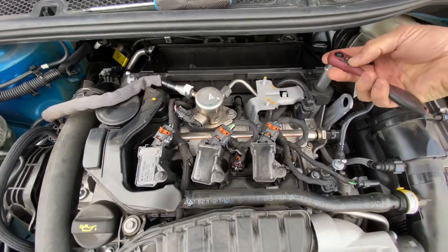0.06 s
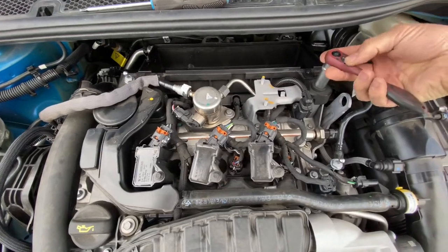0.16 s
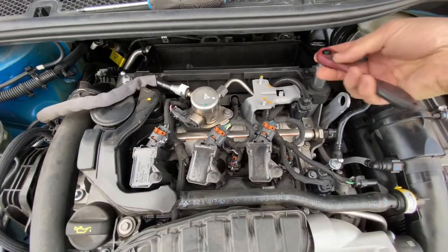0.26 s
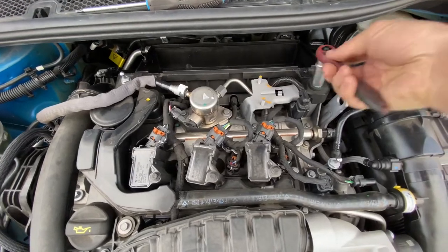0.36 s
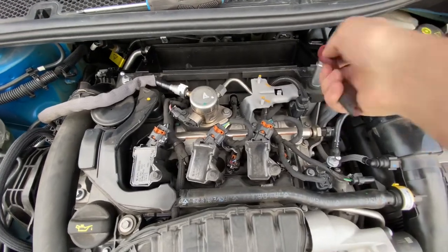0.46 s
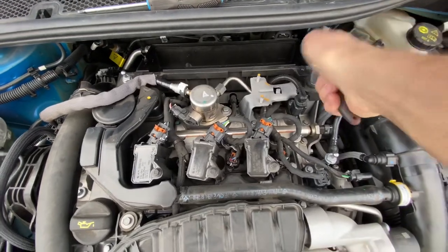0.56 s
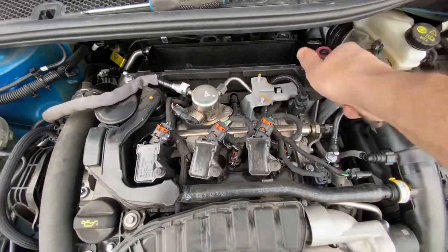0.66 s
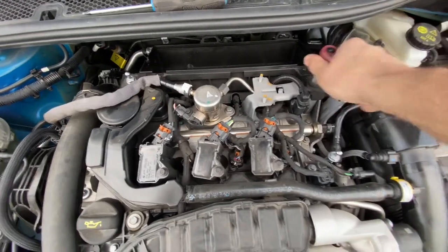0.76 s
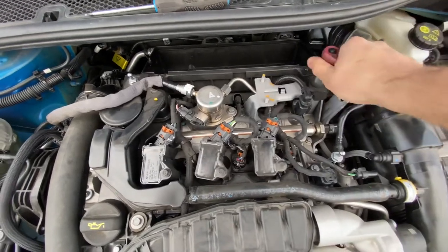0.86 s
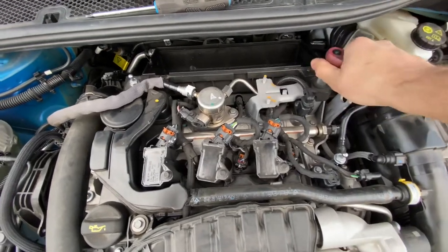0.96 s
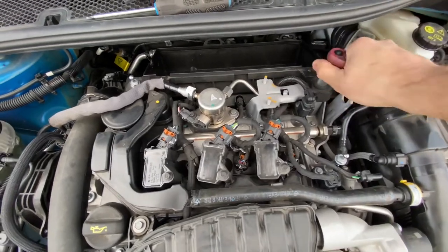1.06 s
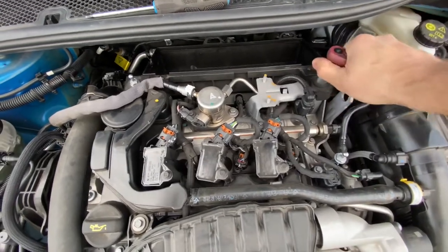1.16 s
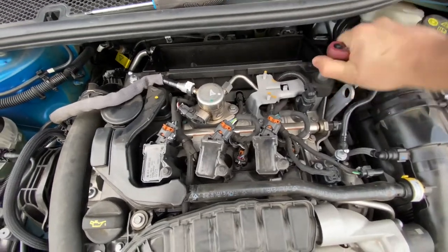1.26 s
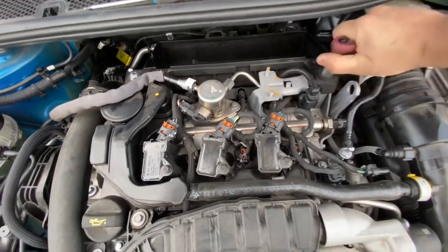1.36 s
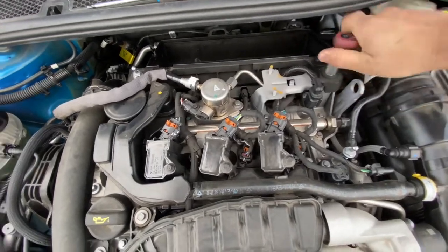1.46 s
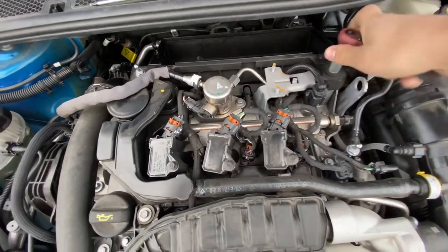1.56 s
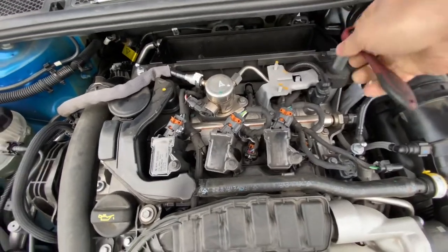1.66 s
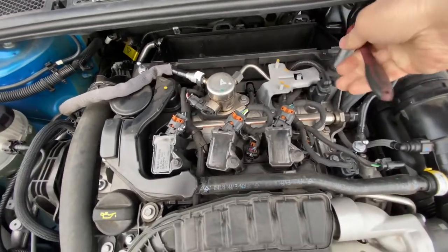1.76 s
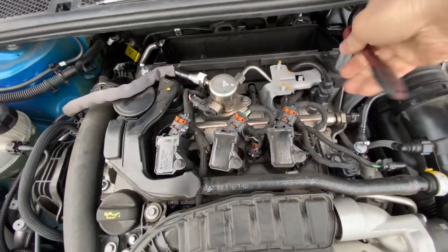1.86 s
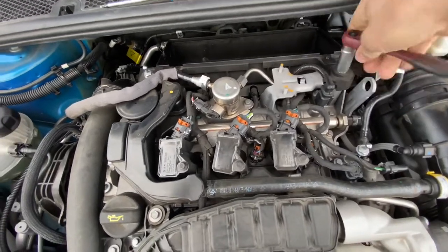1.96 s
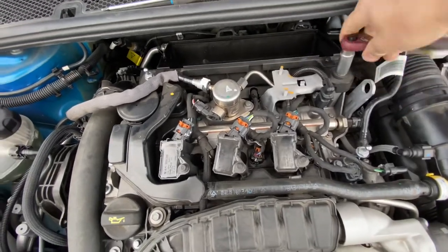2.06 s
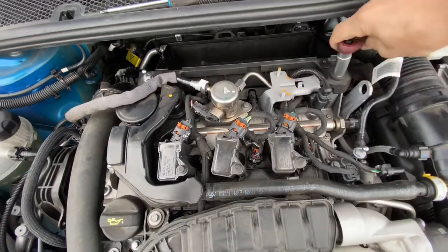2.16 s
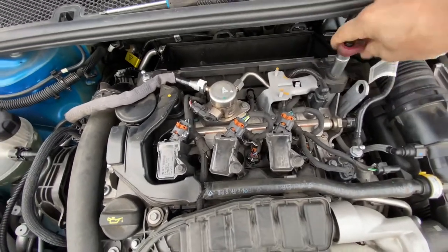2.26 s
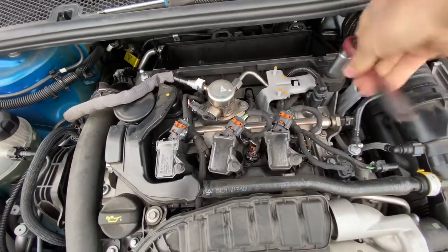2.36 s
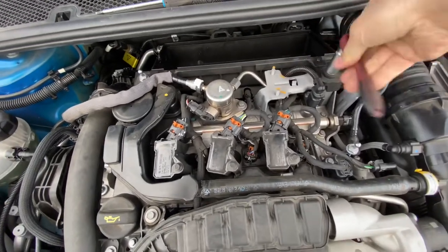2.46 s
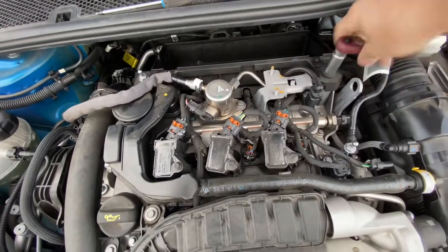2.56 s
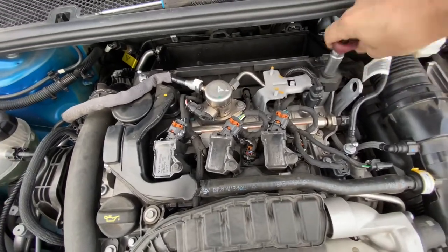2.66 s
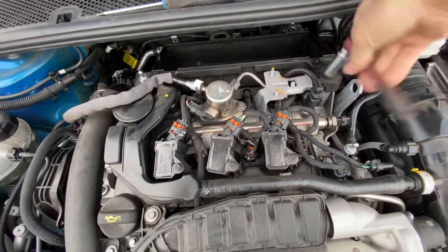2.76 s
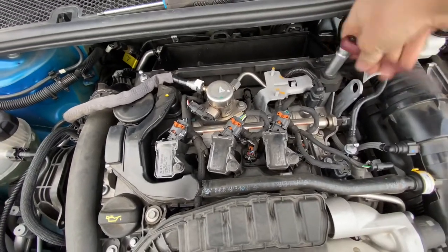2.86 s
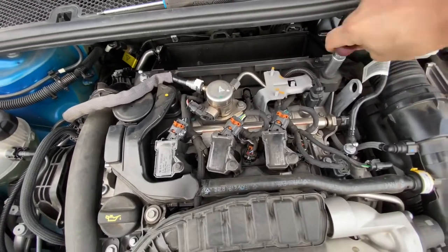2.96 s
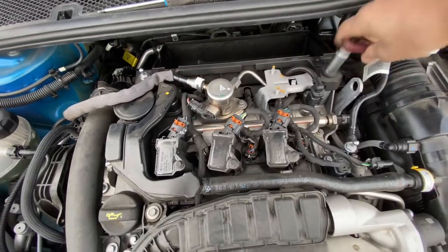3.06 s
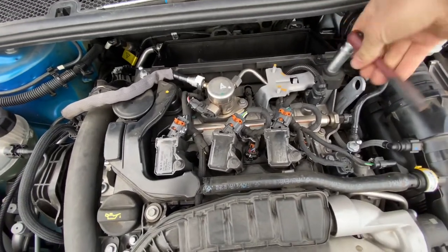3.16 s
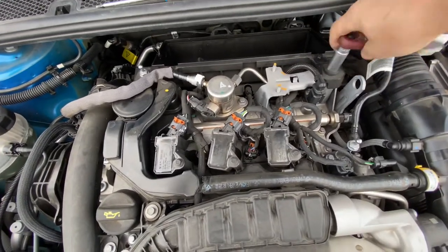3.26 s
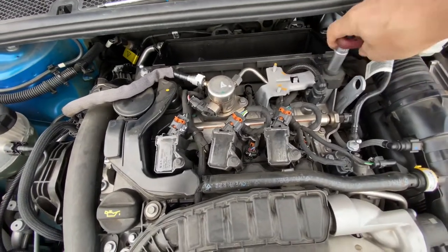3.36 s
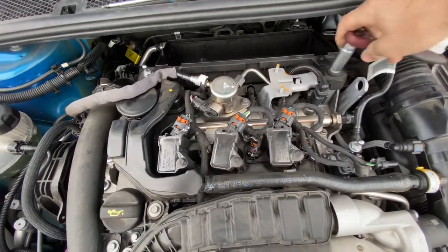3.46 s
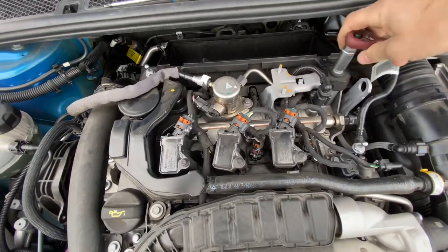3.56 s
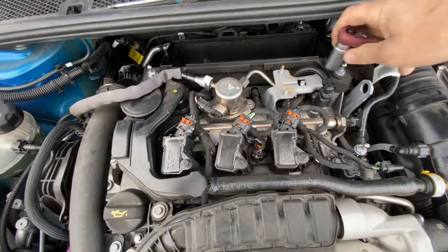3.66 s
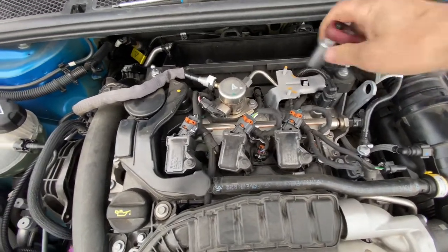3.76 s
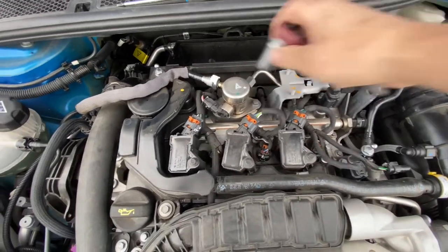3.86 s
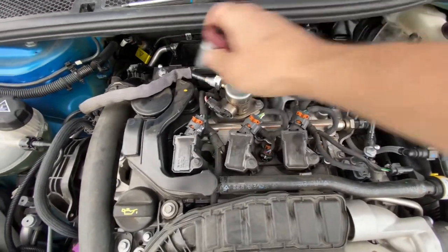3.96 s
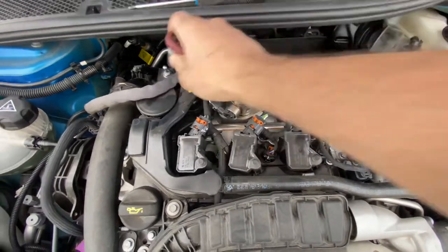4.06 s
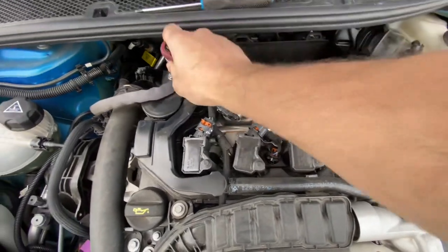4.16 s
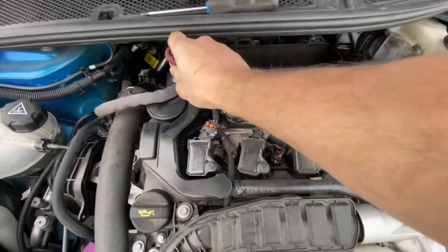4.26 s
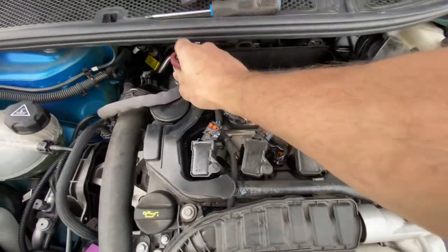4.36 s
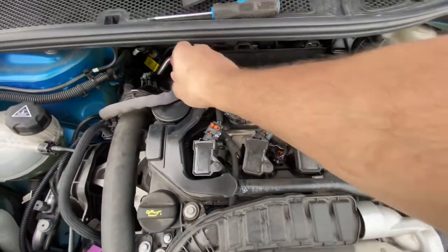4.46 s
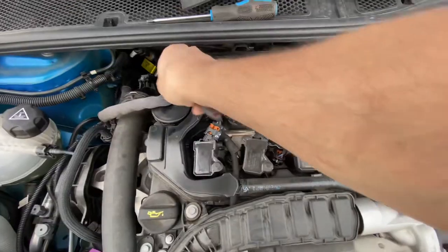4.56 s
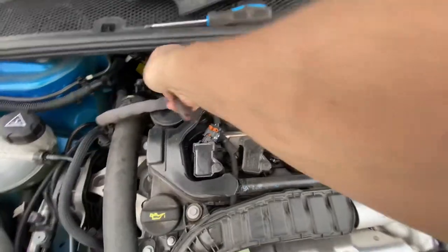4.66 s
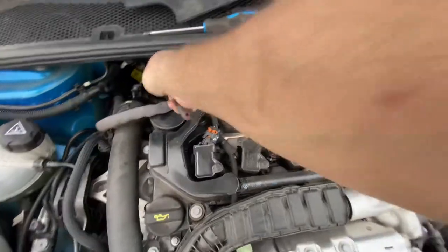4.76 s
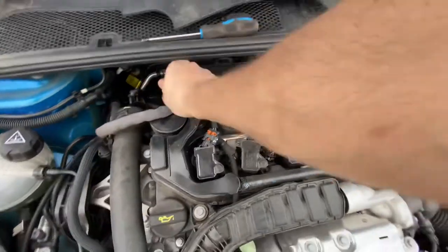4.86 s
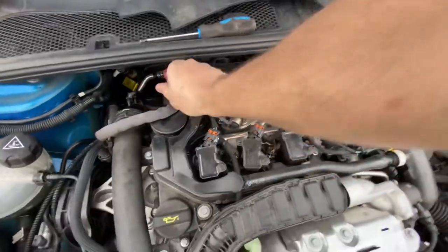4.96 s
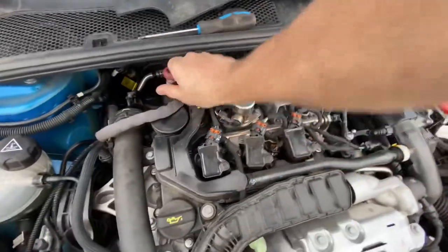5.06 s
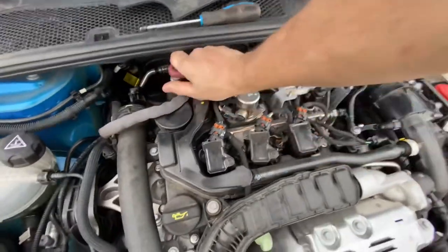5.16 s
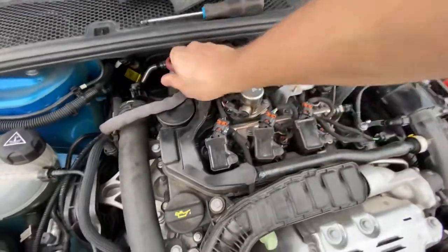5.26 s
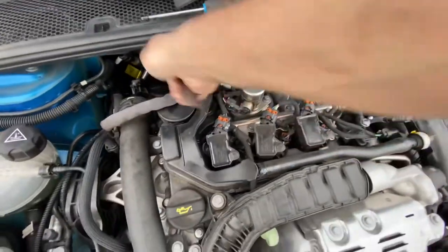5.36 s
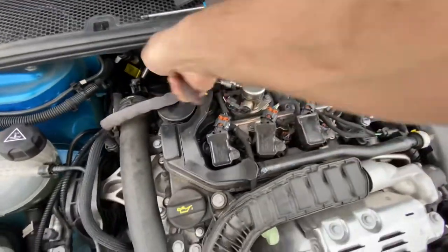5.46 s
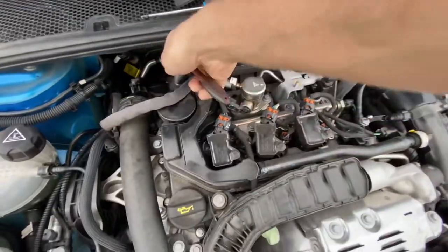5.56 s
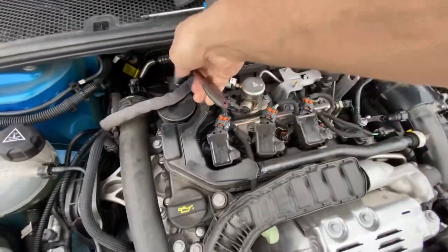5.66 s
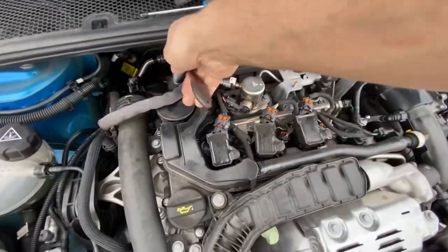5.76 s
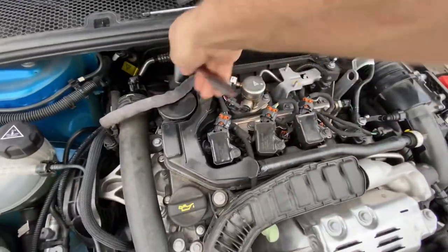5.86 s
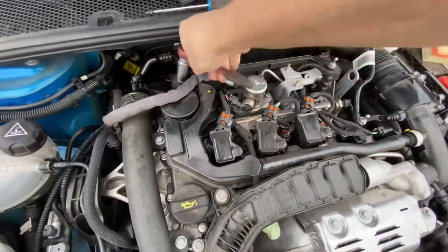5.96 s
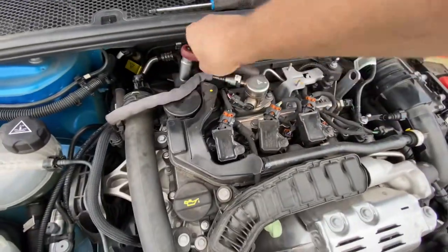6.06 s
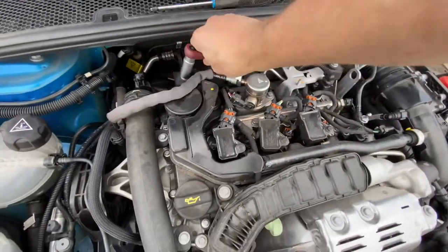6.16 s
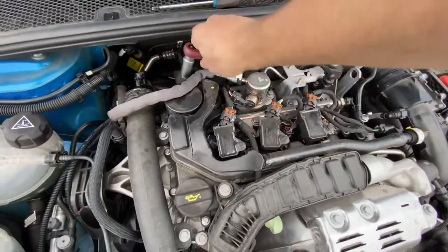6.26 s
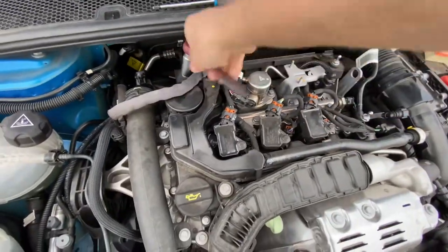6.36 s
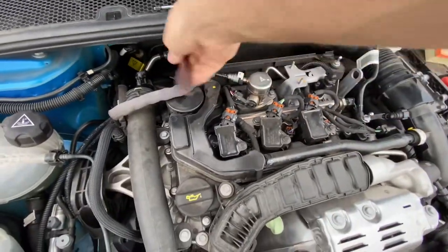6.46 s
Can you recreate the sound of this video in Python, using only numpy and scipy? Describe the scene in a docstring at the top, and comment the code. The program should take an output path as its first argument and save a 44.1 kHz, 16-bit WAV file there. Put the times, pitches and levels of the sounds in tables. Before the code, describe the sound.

Close metallic ratchet clicks, rattles and scrapes work at one bolt, then harder knocks and sparser clicks follow at another, over soft low wind buffeting.

```python
"""Gusts buffet a small two-port microphone as low lumps, over a filtered-noise traffic wash and a wavering hum.
Close by, in an open engine bay, a ratchet wrench works bolts loose: its socket scrapes (friction grains ringing
steel), chatters (chance taps) and knocks on the engine (struck modes), booming a hollow cover. The pawl clicks
over the gear teeth as bright steel rings with a noise crack, and single-pitch bursts add thuds and pings."""
import sys
import numpy as np
from scipy import signal
from scipy.fft import rfft, irfft
from scipy.io import wavfile

SR = 44100
rng = np.random.default_rng(int(sys.argv[2]) if len(sys.argv) > 2 else 0)


def invert_db(level):
    """Linear amplitude ratio for a level in decibels (20 dB per decade), elementwise."""
    return 10 ** (np.asarray(level, dtype=float) / 20)


def to_wav(s):
    """Save 16-bit WAV."""
    ch = np.atleast_2d(s).T  # columns
    pcm = np.round(np.clip(ch, -1, 1) * 32767)  # PCM
    wavfile.write(sys.argv[1], SR, pcm.astype(np.int16))


N = 287928  # scene length in samples

# Wind on the microphone, before the trim of each port: t/s, level/dB
GUST_LEVEL = [(0.0, -47.5), (0.45, -41), (0.77, -50.5), (0.95, -84), (1.0, -52), (1.06, -72), (1.15, -49),
              (1.27, -44), (1.43, -73), (1.55, -52.5), (1.86, -47.5), (2.02, -57), (2.12, -37),
              (2.3, -62.5), (2.52, -45.5), (2.98, -44), (3.18, -34.5), (3.58, -56), (3.64, -76),
              (4.55, -70), (4.63, -45.5), (4.75, -63.5), (5.6, -52), (6.53, -52.5)]
# Tone filter of the wind: f/Hz, relative gain/dB
GUST_COLOUR = [(25, -19.5), (65, 0.5), (250, -3.5), (450, -10), (1200, -35.5)]
# Tone of the distant traffic: f/Hz, relative level/dB per Hz
TRAFFIC_COLOUR = [(30, -16.5), (57, 12), (73, -9), (95, 7.5), (145, 3.5), (200, -32.5), (500, -18.5),
                  (1500, -27.5), (4400, -27.5), (11000, -76.5)]
TRAFFIC_DB = -63
# Swell of the low hum, before it wavers: t/s, level/dB
HUM_LEVEL = [(0, -64.5), (5.7, -70.5), (6.53, -50)]
HUM_HZ = 61  # before it wavers

# Light metal contact between strokes: t/s, level/dB
RESTING_CONTACT = [(0, -67.5), (3.6, -70.5), (4.17, -74), (4.2, -58.5), (6.53, -58.5)]
# Strokes of the socket rubbing on the bolt: t/s of the hardest rub, level/dB, rise/s
RUB_STROKES = [(.3, -47.5, 0.26), (.56, -47.5, 0.057), (1.53, -53, 0.55), (1.856, -33.5, 0.035),
               (2.446, -44, 0.11), (2.278, -33.5, 0.09), (2.675, -32, 0.05), (3.035, -31, 0.06),
               (2.604, -32.5, 0.051), (2.808, -46.5, 0.11), (3.384, -44.5, 0.086), (3.54, -51, 0.033),
               (4.561, -54.5, 1), (5.26, -49.5, 0.7), (5.617, -47.5, 0.048), (6.339, -50.5, 0.24)]
STROKE_RANGE_DB, FALL_PER_RISE = 23, 1.23  # climb within the rise time; fall time over rise time
# Tone of the scrape: f/Hz, relative level/dB per Hz
SCRAPE_COLOUR = [(250, -17), (400, -0.5), (500, -1), (1500, -12), (3200, -16.5), (4600, -15), (7000, -27),
                 (10800, -32), (12000, -63)]
# The socket slides off the bolt and sings on: start t/s, length/s, level/dB
SOCKET_SLIDE = (3.39, 0.175, -62)
# Thin rings of the loose socket: f/Hz, level/dB
SOCKET_RINGS = [(3040, -10), (3910, -11), (5810, -12), (10700, -16)]
SOCKET_T60_S = 0.04
RATTLES_PER_S, RATTLE_DB = 45, 2.5  # chance taps; their gain over the rub

# Socket on bolt and engine: t/s, level/dB, wrench ring re knock/dB, cover boom re knock/dB
SOCKET_KNOCKS = [(0.143, -29, -4.5, -20), (0.2728, -38.5, -12, 0.5), (0.489, -27, -3, -4.5),
                 (0.559, -31, -8, -7.5), (0.704, -36.5, -8, -8), (0.7179, -37.5, -6, -4),
                 (1.1604, -43, -19, -4), (1.3621, -31, -14, -8.5), (1.3949, -34.5, -5, -11),
                 (1.862, -25.5, 4.5, -7), (2.055, -33.5, -7.5, -4.5), (2.1914, -17, 4.5, -9.5),
                 (2.453, -26.5, 2, -5.5), (2.772, -31.5, 0, -1), (2.7931, -27.5, 3.5, -10),
                 (2.8227, -31.5, -4, -0.5), (2.9574, -26.5, 1, -9), (3.129, -18.5, -3.5, -10),
                 (3.1636, -28, -10, -7.5), (3.347, -43, -21, -17.5), (3.54, -45.5, 9, -22),
                 (4.1914, -17, -0.5, -20), (4.3045, -13.5, -8, -24.5), (4.327, -13, -4.5, -22),
                 (4.4589, -37, -33, -12.5), (4.502, -34.5, -17, -15), (4.537, -24, -14, -12),
                 (4.549, -44.5, -2, 14.5), (4.802, -30, -16, -16), (5.036, -30.5, -5, -7.5),
                 (5.1636, -28.5, -16, -11), (5.188, -26.5, -12.5, -20), (5.4323, -26.5, 3, -12),
                 (5.4709, -26.5, -5, -9.5), (5.499, -34, -12, -14), (5.518, -41, -18, -22),
                 (5.617, -25, -10, -14.5), (5.685, -27, -32, -22), (5.768, -21.5, -13, -13.5),
                 (5.785, -27.5, -25, -10), (5.8116, -29, -11, -16), (5.8254, -28, -14, -29),
                 (5.843, -31.5, -19, -14.5), (5.944, -36, -19, -9.5), (6.032, -13.5, -0.5, -13),
                 (6.0974, -29.5, -4, -11), (6.1959, -24.5, -10.5, -20.5), (6.349, -20, -3, -17.5),
                 (6.457, -36.5, -8, -25), (6.499, -20.5, -6.5, -19.5)]
# Modes of the wrench steel, before extra damping: f/Hz, level/dB, t60/s
WRENCH_MODES = [(3326, -6, 0.028), (4487, 5, 0.022), (4656, -7, 0.067), (5753, -0.5, 0.032),
                (6530, -6, 0.036), (7314, -4, 0.024), (9420, 1, 0.026), (10505, 6.5, 0.015)]
# Modes of the engine body: f/Hz, level/dB, t60/s
ENGINE_MODES = [(688, -11, 0.13), (965.6, -11.5, 0.086), (1255, -6.5, 0.047), (1744, -8, 0.051),
                (2133, 2, 0.01), (2453, -2, 0.054), (3000, -1.5, 0.045)]
# Modes of the hollow cover: f/Hz, level/dB, t60/s
COVER_MODES = [(448, 3, 0.17), (320.2, 7, 0.042), (204.6, -10, 0.13)]
MOVE_S = 3.8  # the wrench moves to a second bolt
# Pairs give the first bolt, then the second
BOLT_TILT_DB = (-5, -1.5)  # dB per octave: knocks on the first bolt are duller
BOOM_TILT_DB = (1.5, -6)  # dB per octave: the second bolt booms deeper
LEAK_DB = (-15.5, -12.5)  # engine ring re click

# Pawl dropping over single teeth on slow backswings: t/s, level/dB
PAWL_CLICKS = [(0.2139, -20), (0.2442, -15), (0.3124, -14), (0.3688, -16), (0.5006, -23), (0.534, -24.5),
               (1.4724, -19.5), (1.4998, -19), (1.5184, -25), (1.5387, -18.5), (1.5666, -18),
               (1.6083, -22.5), (1.6394, -20), (1.69, -21.5), (1.8608, -20.5), (2.1829, -25),
               (2.3226, -24.5), (2.3393, -16.5), (2.4415, -27.5), (2.5763, -25), (2.701, -16.5),
               (2.7115, -21.5), (2.7235, -18.5), (2.7935, -23), (2.9856, -24.5), (3.068, -22),
               (3.103, -17.5), (3.1275, -14.5), (3.1595, -25.5), (3.3315, -28.5), (3.3913, -22.5),
               (3.4444, -44), (4.5687, -18), (4.5999, -17.5), (4.6241, -33), (5.2377, -17.5), (5.344, -20),
               (5.69, -18), (5.8963, -38.5), (6.0197, -23), (6.374, -18), (6.3887, -24), (6.407, -20.5),
               (6.437, -29.5), (6.446, -24)]
# Runs of teeth, quick or slow, their speed changing evenly: start t/s, length/s, teeth/s at start, teeth/s at
# end, mean level/dB
TOOTH_RUNS = [(2.238, 0.079, 96, 110, -21), (2.647, 0.04, 96, 260, -18.5), (3.006, 0.045, 143, 149, -19),
              (3.075, 0.024, 140, 126, -17), (5.254, 0.064, 85, 45, -19), (6.246, 0.093, 75, 75, -22.5)]
TOOTH_JITTER_S, TOOTH_UNEVEN_DB = 0.00066, 2  # rms scatter

# Bursts with one pitch, from low thuds to pings of the steel: t/s, level/dB, f/Hz
PITCHED_BURSTS = [(0.49, -23.5, 682), (0.533, -18, 4300), (0.559, -29, 700), (1.368, -36, 531),
                  (2.112, -32, 155), (2.191, -21, 1800), (2.518, -31.5, 193), (2.856, -33.5, 67),
                  (3.194, -29.5, 120.3), (3.3316, -25.5, 4380), (3.538, -39, 99.5), (4.194, -15, 3000),
                  (5.042, -32, 199), (5.242, -33, 214), (5.344, -21.5, 3910), (6.032, -21.5, 1294),
                  (6.053, -29, 123), (6.35, -25.5, 1860), (6.497, -33, 216)]
THUD_CYCLES, PING_T60_S = 7, 0.025  # cycles to die by 60 dB, but no faster than this many s

# Phase by which the left port leads: f/Hz, phase/rad
PORT_LEAD = [(430, 0), (690, -3.6), (1460, -5.6), (2800, -3.3), (4050, -5.3), (4740, -3.8), (5250, 0),
             (7490, .6), (11800, 2.8), (16500, 3.1)]
# Level of the left port over the right: f/Hz, level/dB
PORT_BALANCE = [(150, -3), (420, -10), (1150, 1), (1600, -3), (5500, -3), (9500, 2), (13000, 0)]
# Likeness of the two ports: f/Hz, likeness (0 to 1)
PORT_LIKENESS = [(400, 1), (1300, 0.8), (6000, 0.8), (12000, 0.93)]
# Colour of the microphone: f/Hz, gain/dB
MICROPHONE_COLOUR = [(10500, 1.5), (12500, 5.5), (16500, -14.5)]


def evened(x):
    """Scales a signal to rms 1."""
    return x / np.sqrt(np.mean(x ** 2) + 1e-20)


def read(points, hz):
    """Reads a spectrum table on a log-frequency axis."""
    f, value = np.transpose(points)
    return np.interp(np.log(hz + 1), np.log(f + 1), value)


def level(curve):
    """Draws a dB curve as a gain for every sample."""
    s, db = np.transpose(curve)
    return invert_db(np.interp(np.arange(N) / SR, s, db))


def filtered(x, points):
    """Filters each row by a spectrum table."""
    return irfft(rfft(x) * invert_db(read(points, np.fft.rfftfreq(N, 1 / SR))), N)


def coloured(x, points):
    """Filters each row, then scales the whole to rms 1."""
    return evened(filtered(x, points))


def wobble(cutoff_hz, depth_db):
    """Random gain: noise low-passed at cutoff_hz, swinging by depth_db rms."""
    slow = signal.lfilter(*signal.butter(2, cutoff_hz, fs=SR), rng.standard_normal(N))
    return invert_db(depth_db * evened(slow))


def ring(modes, t, spread, uneven_db, rise_s, tilt_db=0, count=5, damping=1):
    """One blow in two directions: clusters of close decaying modes, balanced anew each time; first row peaks at 1."""
    hz, db, t60 = np.repeat(modes, count, axis=0).T[:, :, None]
    detune, strength, *phase = rng.standard_normal((4, len(hz), 1))
    db = db + uneven_db * strength + tilt_db * np.log2(hz / hz[0])
    decay = invert_db(db - 60 * damping * t / t60)
    tones = decay * np.sin(2 * np.pi * hz * (1 + spread * detune) * t + 2 * np.array(phase))
    sound = tones.sum(1) * (1 - np.exp(-t / rise_s))
    return sound / abs(sound[0]).max()


def puff(t, db, t60):
    """A dying burst of noise in two directions."""
    return rng.standard_normal((2, len(t))) * invert_db(db - 60 * t / t60)


def add(mix, s, sound):
    """Mixes a sound in at time s."""
    part = mix[:, round(s * SR):][:, :sound.shape[1]]
    part += sound[:, :part.shape[1]]


def gusts():
    """Eddies hit the ports as low lumps of a few cycles, only loosely related left and right."""
    lumps = np.zeros((2, N))
    for hz in np.geomspace(40, 700, 16):
        t = np.arange(int(3.5 * SR / hz)) / SR
        hits = rng.standard_normal((2, N)) * (rng.random((2, N)) < 0.27 * hz / SR)
        lump = np.hanning(len(t)) * np.sin(2 * np.pi * hz * t)
        lumps += signal.oaconvolve(hits, [lump], axes=1)[:, :N]
    # each buffet shakes all pitches at once
    a, b = coloured(lumps * wobble(9.2, 5.17), GUST_COLOUR)
    left = invert_db(2.0) * a
    right = invert_db(6.0) * (0.23 * a + b)
    return level(GUST_LEVEL) * np.array([left, right])


def traffic():
    """A smooth far wash of filtered noise, and a low sine hum that wavers in pitch and level."""
    turns = np.cumsum(HUM_HZ * wobble(7.4, 0.74)) / SR
    hum = level(HUM_LEVEL) * wobble(4, 0.59) * np.sin(2 * np.pi * turns)
    wash = coloured(rng.standard_normal((2, N)) * wobble(5.1, 1.2), TRAFFIC_COLOUR)
    return invert_db(TRAFFIC_DB) * wash + hum


def rubbing():
    """How hard metal rubs on metal, as a gain: strokes that swell and fade over a light contact."""
    t, gain = np.arange(N) / SR, level(RESTING_CONTACT)
    for s, stroke_db, rise_s in RUB_STROKES:
        away = np.where(t < s, s - t, (t - s) / FALL_PER_RISE) / rise_s
        gain = np.maximum(gain, invert_db(stroke_db - STROKE_RANGE_DB * away))
    return gain


def socket_singing(grains):
    """Friction grains excite the thin rings of the loose socket, each flickering in level."""
    t = np.arange(4000) / SR
    hz, db = np.transpose(SOCKET_RINGS)[:, :, None]
    bell = invert_db(db - 60 * t / SOCKET_T60_S) * np.sin(2 * np.pi * hz * t)
    singing = np.zeros(N)
    for tone in bell:
        sung = evened(signal.oaconvolve(grains, tone)[:N])
        singing += wobble(20, 4) * sung * abs(tone).max()
    return singing


def scrape():
    """Dense uneven grains of friction; under harder rubs the pawl skates over the teeth and the wrench sings."""
    grains = rng.standard_normal((2, N)) * wobble(200, 2.5) * wobble(25, 3)
    steel = ring(WRENCH_MODES, np.arange(2400) / SR, 0.12, 4.4, 0.000072, count=12)
    skating = evened(signal.oaconvolve(grains[:1], steel, axes=1)[:, :N])
    rub = rubbing()
    share = np.clip(rub / invert_db(-27), 0, 1)  # harder rubbing is brighter
    friction = (1 - share) * coloured(grains, SCRAPE_COLOUR) + share * skating

    t, (start, length, slide_db) = np.arange(N) / SR, SOCKET_SLIDE
    # 2.6 ms fade in, four times longer fade out
    fade = np.clip(np.minimum(t - start, (start + length - t) / 4) / 0.0026, 0, 1)
    slide = invert_db(slide_db) * fade * (socket_singing(grains[0]) + skating)
    return slide + rub * friction


def rattle():
    """The loose socket chatters: small chance taps on the engine, scaled by the rubbing."""
    out, t = np.zeros((2, N)), np.arange(2400) / SR
    rub = rubbing()
    for _ in range(10):  # ten different taps share the rate
        chance = rng.random(N) < RATTLES_PER_S / 10 / SR
        taps = invert_db(4.0 * np.minimum(rng.exponential(1, N), 4)) * chance
        body = ring(ENGINE_MODES, t, 0.15, 4, 0.0012, count=10)
        steel = ring(WRENCH_MODES, t, 0.1, 4, 0.0004, tilt_db=-6, count=8)
        tap = body + invert_db(-8) * steel
        out += signal.oaconvolve((taps * rub)[None], tap, axes=1)[:, :N]
    return invert_db(RATTLE_DB) * out


def knocks():
    """Blunt blows ring the engine, dull steel and booming cover, among small contacts just before and after."""
    out, t = np.zeros((2, N)), np.arange(6000) / SR
    short = t[:2400]
    for s, knock_db, steel_db, boom_db in SOCKET_KNOCKS:
        bolt = int(s > MOVE_S)
        steel = ring(WRENCH_MODES, short, 0.12, 4, 0.0005, tilt_db=-10.5, count=10, damping=1.3)
        body = ring(ENGINE_MODES, short, 0.1227, 1.9, 0.00056, tilt_db=BOLT_TILT_DB[bolt], count=8)
        blow = body + invert_db(steel_db) * steel
        add(out, s, invert_db(knock_db) * blow)
        # small contacts from 6 ms before to 12 ms after, directions swapped
        for delay, drop in rng.random((3, 2)):
            add(out, s + 0.018 * delay - 0.006, invert_db(knock_db - 13.5 - 10 * drop) * blow[::-1])
        shake = signal.lfilter([1], [1, -0.7], puff(t, -35.5, 0.13))  # low-passed noise
        boom = ring(COVER_MODES, t, 0.0037, 2.8, 0.0045, tilt_db=BOOM_TILT_DB[bolt], count=2)
        add(out, s, invert_db(knock_db) * (shake + invert_db(boom_db) * boom))
    return out


def teeth():
    """Every tooth the pawl passes: clicks placed one by one, then runs whose speed changes evenly."""
    rows = list(PAWL_CLICKS)
    for start, length, first_per_s, last_per_s, click_db in TOOTH_RUNS:
        jitter, uneven = rng.standard_normal((24, 2)).T
        t = np.arange(0, length, 1 / SR)
        speed = first_per_s + (last_per_s - first_per_s) * t / length
        passed = np.cumsum(speed) / SR
        tooth = np.arange(int(passed[-1]) + 1)
        at = start + np.interp(tooth, passed, t) + TOOTH_JITTER_S * jitter[tooth]
        rows += zip(at, click_db + TOOTH_UNEVEN_DB * uneven[tooth])
    return rows


def pawl():
    """A sharp crack and the short ring of the wrench; a little passes down the socket into the engine."""
    out, t = np.zeros((2, N)), np.arange(2400) / SR
    for s, click_db in teeth():
        tilt_db = 3 * rng.standard_normal()  # some teeth sound brighter
        steel = ring(WRENCH_MODES, t, 0.07, 4, 0.00007, tilt_db=tilt_db, count=5, damping=1.3)
        crack = np.diff(puff(t, -8, 0.007), prepend=0)  # differencing brightens the noise
        body = ring(ENGINE_MODES, t, 0.1074, 4.2, 0.0011, count=8)
        leak = invert_db(LEAK_DB[int(s > MOVE_S)]) * body
        add(out, s, invert_db(click_db) * (steel + crack + leak))
    return out


def thuds():
    """One cluster of close modes per burst: a few soft cycles when low, a short ping when high."""
    out = np.zeros((2, N))
    for s, thud_db, hz in PITCHED_BURSTS:
        t60 = max(THUD_CYCLES / hz, PING_T60_S)
        blow = ring([(hz, 0, t60)], np.arange(0, t60, 1 / SR), 0.05, 3, 1 / hz, count=3)
        add(out, s, invert_db(thud_db) * blow)
    return out


def ports(x):
    """The housing turns phase and level differently at each port; the right one also hears a second direction."""
    hz, (first, second) = np.fft.rfftfreq(N, 1 / SR), rfft(x)
    alike = np.clip(read(PORT_LIKENESS, hz), 0, 1)
    # half the difference goes to each port
    half = invert_db(read(PORT_BALANCE, hz) / 2) * np.exp(0.5j * read(PORT_LEAD, hz))
    left = first * half
    right = (alike * first + np.sqrt(1 - alike ** 2) * second) / half
    return irfft(np.array([left, right]), N)


def scene():
    """Airborne sound through the ports, wind straight on them."""
    airborne = traffic() + scrape() + rattle() + knocks() + pawl() + thuds()
    return gusts() + ports(airborne)


def band_limit(x):
    """A steep low-pass at the top of the band."""
    return signal.sosfilt(signal.butter(12, 16840, fs=SR, output="sos"), x)


def record(dry):
    """The microphone colours the treble of the finished mix."""
    heard = filtered(dry, MICROPHONE_COLOUR)
    return band_limit(heard)


dry = scene()
out = record(dry)
to_wav(out)
```